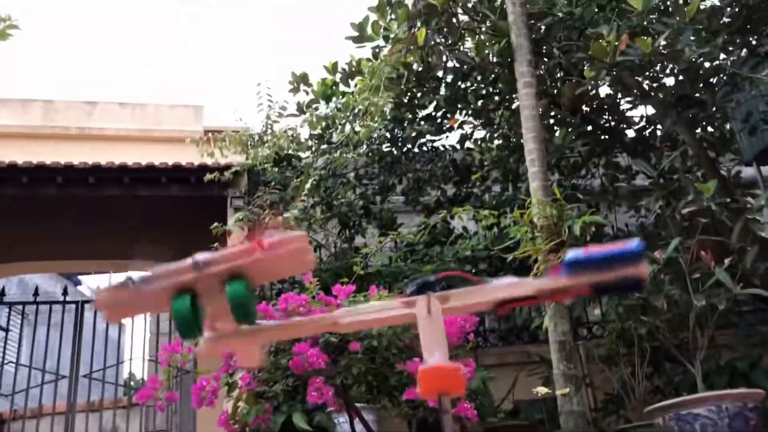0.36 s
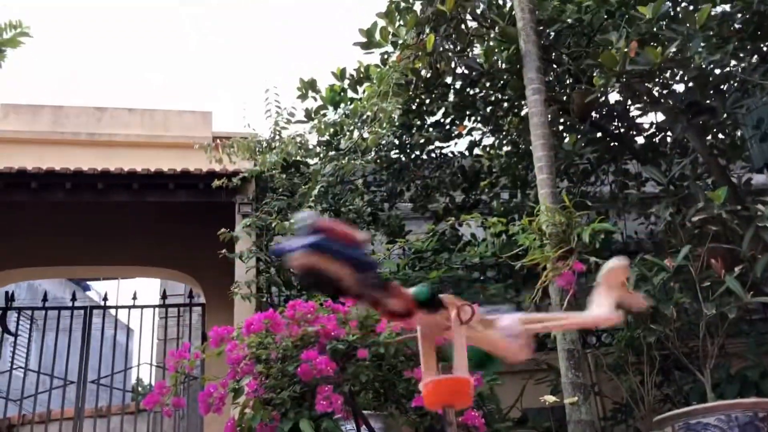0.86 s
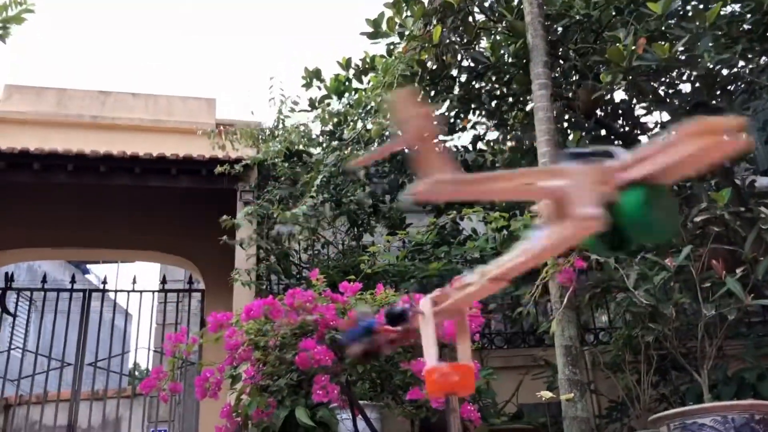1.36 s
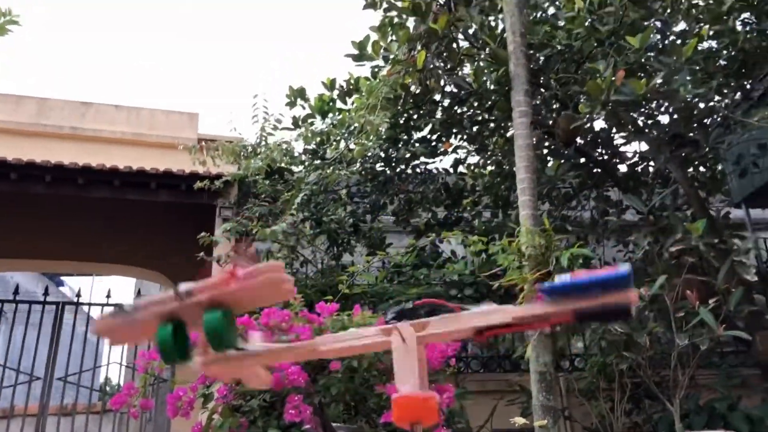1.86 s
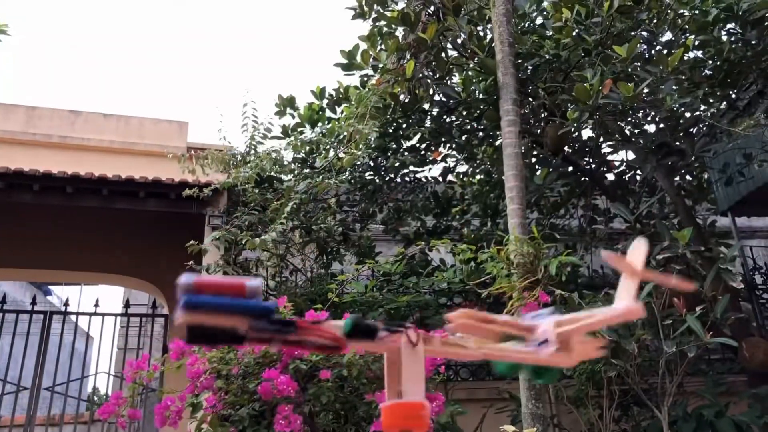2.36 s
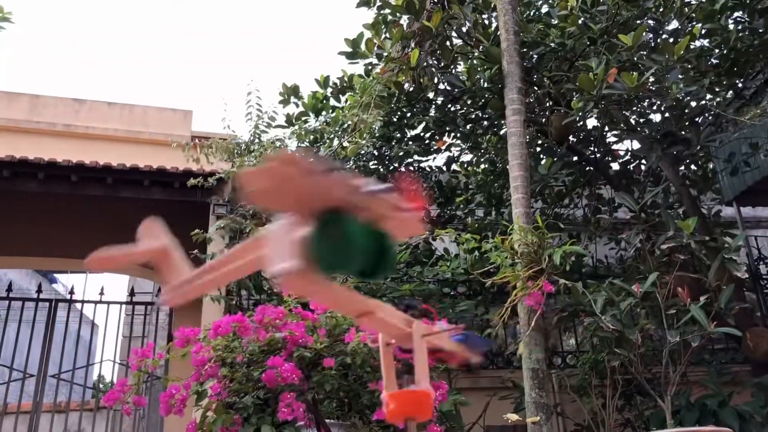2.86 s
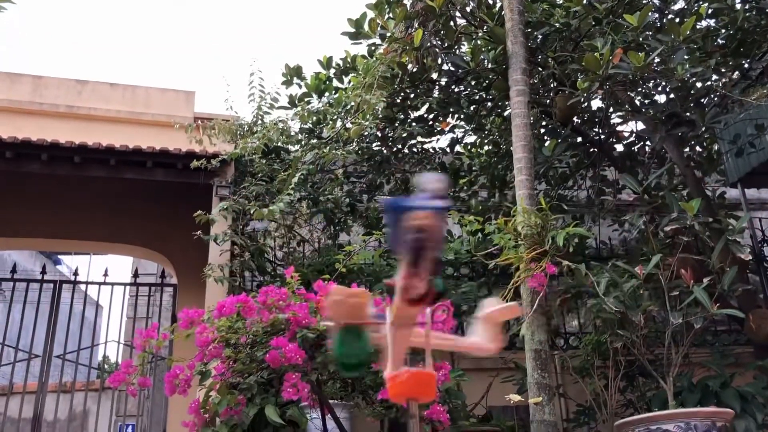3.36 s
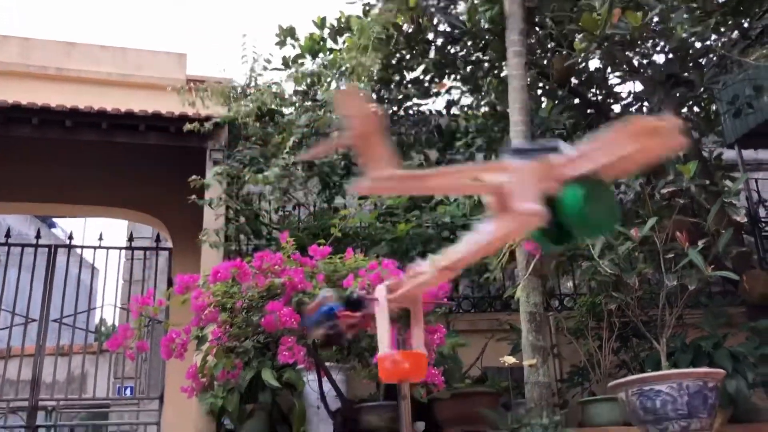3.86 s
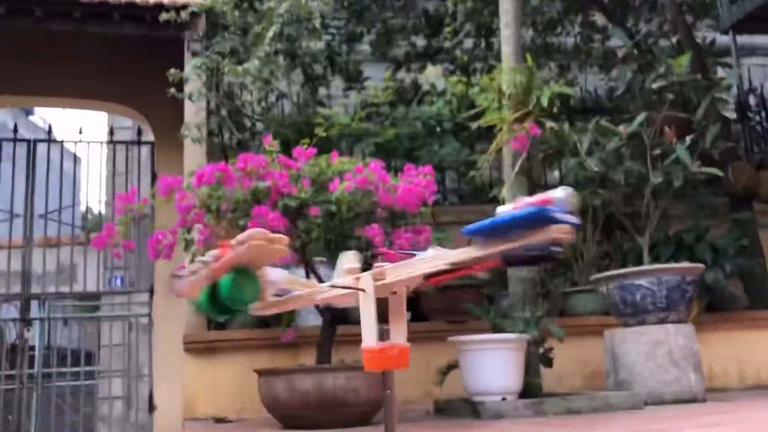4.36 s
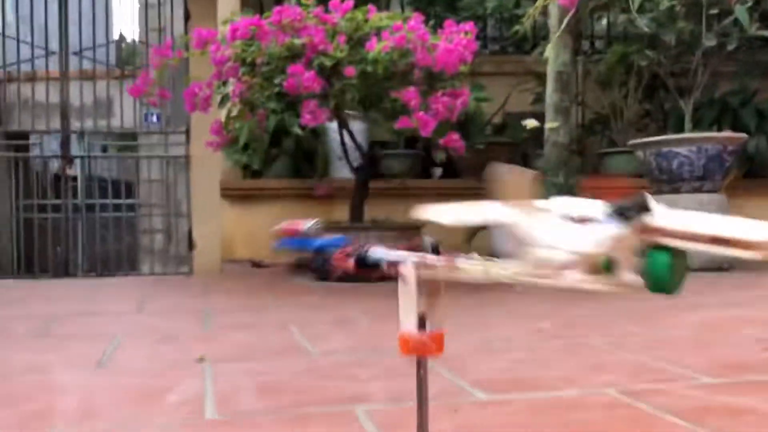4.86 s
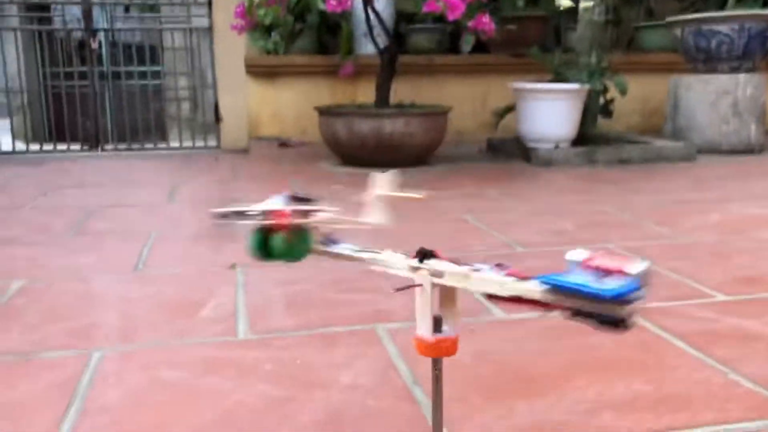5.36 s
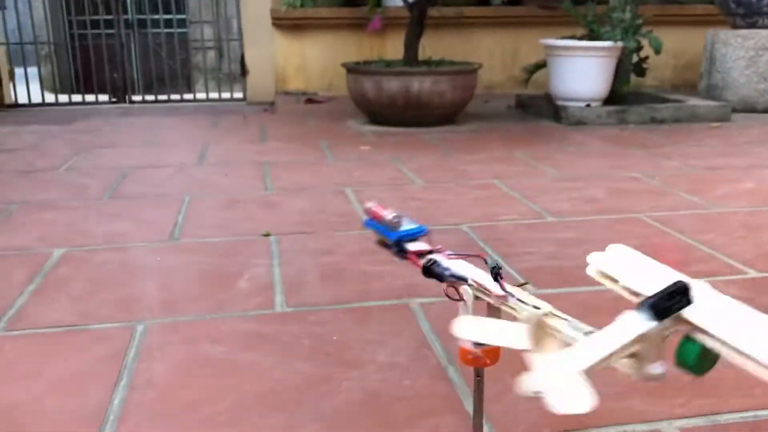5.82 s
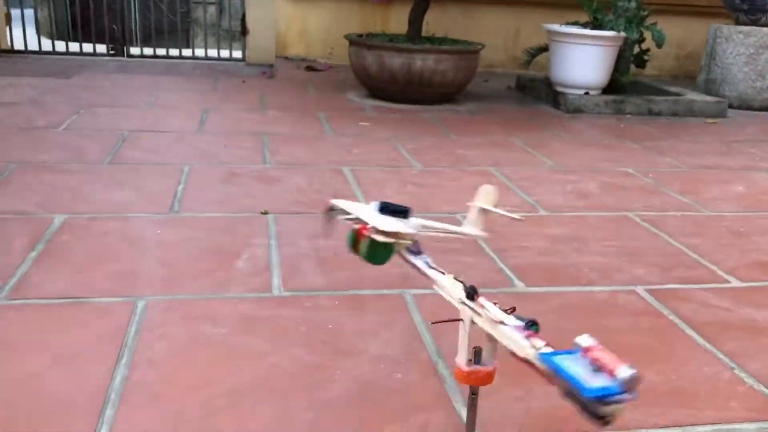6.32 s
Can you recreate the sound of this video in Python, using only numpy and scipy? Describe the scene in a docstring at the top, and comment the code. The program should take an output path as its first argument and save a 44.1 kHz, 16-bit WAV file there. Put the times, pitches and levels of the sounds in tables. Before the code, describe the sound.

Close, high gritty whine of a toy motor and gears dips, spins up, winds down, cuts out and repeats on a quiet patio.

```python
"""A geared electric motor whines close by: a 6-tooth pinion meshes with a 63-tooth wheel.
It sags, spins up again and winds down; twice the sound cuts out and an earlier stretch plays over again.
Tooth-mesh harmonics with wheel-turn sidebands make the whine; rough flanks grind through a resonant casing.
A hum, a slow shaft shake and a panel rattle swell at times; quiet low outdoor air, shaped noise, lies underneath."""
import sys
import numpy as np
from scipy import signal
from scipy.fft import rfft, irfft
from scipy.io import wavfile

SR = 44100
rng = np.random.default_rng(int(sys.argv[2]) if len(sys.argv) > 2 else 0)


def invert_db(level):
    """Linear amplitude ratio for a level in decibels (20 dB per decade), elementwise."""
    return 10 ** (np.asarray(level, dtype=float) / 20)


def wrap_up_sound(samples):
    """Save the sound to the file named by the first command line argument, as 16-bit audio."""
    columns = np.atleast_2d(samples).T
    # keep every value between -1 and 1, then stretch to whole-number steps
    tamed = np.clip(columns, -1, 1)
    steps = np.round(tamed * 32767).astype(np.int16)
    wavfile.write(sys.argv[1], SR, steps)


N = 295909
T = np.arange(N) / SR   # time, s
WHEEL_TEETH, PINION_TEETH = 63, 6
HIGH_SPOT_AT = .14   # place in a wheel turn of the grinding's high spot, turns


def rms_one(x):
    """Normalisation: scale to unit root-mean-square."""
    return x / np.sqrt(np.mean(x ** 2) + 1e-20)


def in_time(rows):
    """Linear interpolation: each column after t/s becomes one value a sample."""
    s, *columns = np.transpose(rows)
    return [np.interp(T, s, column) for column in columns]


def coloured(x, spectrum):
    """Spectral shaping: a smooth (f/Hz, level/dB) outline, interpolated over log frequency."""
    hz = np.maximum(np.fft.rfftfreq(N, 1 / SR), 1)
    points_hz, points_db = np.transpose(spectrum)
    gain_db = np.interp(np.log(hz), np.log(points_hz), points_db)
    return irfft(rfft(x) * invert_db(gain_db), N)


def drift(pole_hz):
    """Low-pass random process: noise through two equal poles, computed every 40 samples, unit rms."""
    r = np.exp(-80 * np.pi * pole_hz / SR)
    noise = rng.standard_normal(N // 40 + 2002)
    slow = signal.lfilter([1], [1, -2 * r, r * r], noise)[2000:]   # settled part only
    return np.interp(np.arange(N) / 40, np.arange(len(slow)), rms_one(slow))


def swelling(rest_db, swells):
    """Amplitude envelope: a rest level with Gaussian rises in dB."""
    rise_db = sum(db * np.exp(-((T - peak_s) / width_s) ** 2) for peak_s, width_s, db in swells)
    return invert_db(rest_db + rise_db)


def resonance(x, hz, width_hz):
    """Second-order resonator: one ringing band, gain 1 at its peak."""
    r = np.exp(-np.pi * width_hz / SR)
    poles = [1, -2 * r * np.cos(2 * np.pi * hz / SR), r * r]
    return signal.lfilter([(1 - r * r) / 2, 0, (r * r - 1) / 2], poles, x)


def worn(turns, size):
    """Periodicity of rotation: a fixed random surface is met again on every turn."""
    surface = rng.standard_normal(size)
    return rms_one(np.interp(turns % 1, np.arange(size) / size, surface, period=1))


def shaft_tones(turns, tones, waver_db=3.5):
    """Shaft orders: faults that recur a whole number of times a turn give slowly wavering sines."""
    out = np.zeros(N)
    for order, db in tones:
        level = invert_db(db + waver_db * drift(3.7))
        out += level * np.sin(2 * np.pi * (order * turns + rng.random()))
    return out


# Outline of the outdoor air: f/Hz, relative spectral level/dB
AIR_OUTLINE = [(40, -12), (85, 2), (200, -10.5), (500, -7), (900, -17), (1500, -19), (16000, -23)]
# Swells of the air: peak t/s, half width t/s, rise in level/dB
AIR_RISES = [(4.9, 0.98, 3.5), (6.7, 0.99, 1.8)]


def outdoor_air():
    """Broadband noise: a mostly low random spectrum whose level drifts."""
    noise = rms_one(coloured(rng.standard_normal(N), AIR_OUTLINE))
    return swelling(-56, AIR_RISES) * invert_db(2.0 * drift(7.1)) * noise


# Swells of the slow shake: peak t/s, half width t/s, rise in level/dB
SHAKE_RISES = [(1.3, .4, 6.5), (2.15, 0.27, 14), (2.7, .3, 12)]


def shaft_shake(wheel):
    """First shaft order: one sine cycle a wheel turn."""
    return swelling(-72.5, SHAKE_RISES) * np.sqrt(2) * np.sin(2 * np.pi * wheel)


# Swells of the hum: peak t/s, half width t/s, rise in level/dB
HUM_RISES = [(0.1, 0.37, 16.5), (.6, 0.33, 16.5), (1.45, 0.055, 5.2), (2.2, .4, 19.6)]


def hum(wheel):
    """A higher shaft order: a sine at 24 cycles a wheel turn."""
    return swelling(-60, HUM_RISES) * shaft_tones(wheel, [(24, 3)], waver_db=1)


# Swells of the panel rattle: peak t/s, half width t/s, rise in level/dB
RATTLE_RISES = [(0, 0.31, 11), (1.02, 0.069, 13), (2.15, 0.17, 9), (2.8, .12, 3.5)]


def panel_rattle(wheel):
    """Forced resonance: a loose panel buzzes at its own pitch, shaken twice a wheel turn by the high spots."""
    shaken = invert_db(8.2 * np.cos(4 * np.pi * (wheel - HIGH_SPOT_AT)))
    rough = rng.standard_normal(N) + 1.8 * worn(wheel, size=1008)
    buzz = rms_one(resonance(shaken * rough, hz=1325, width_hz=110))
    return swelling(-44.5, RATTLE_RISES) * buzz


def grit():
    """Impulsive excitation: dense ticks of uneven size between the teeth, softened by a low-pass."""
    per_s, level_db, spread_db, cut_hz = 900, -7.5, 3.5, 5500   # level is before the low-pass
    sizes = invert_db(spread_db * np.minimum(rng.exponential(1, N), 3)) * rng.choice([-1, 1], N)
    ticks = invert_db(level_db) * rms_one(sizes * (rng.random(N) < per_s / SR))
    return signal.sosfilt(signal.butter(2, cut_hz, fs=SR, output="sos"), ticks)


def knocks(wheel, slack):
    """Backlash impact: loose teeth strike twice a wheel turn as short decaying bursts of noise."""
    decay_s = 0.0011
    at = np.flatnonzero(np.diff(np.floor(wheel * 2 + .1)))
    blows = np.zeros(N)
    blows[at] = slack[at] * invert_db(10.5 + 1.5 * rng.standard_normal(len(at)))
    bursts = rng.standard_normal(N) * signal.lfilter([1], [1, -np.exp(-1 / (decay_s * SR))], blows)
    return signal.sosfilt(signal.butter(2, [900, 11000], "band", fs=SR, output="sos"), bursts)


# Tones of the wheel shaft: cycles per wheel turn, level/dB over the random grinding
WHEEL_ORDERS = [(19, -29), (20, -25), (21, -23), (22, -27), (23, -25), (25, -30), (26, -28), (28, -26),
                (29, -24), (30, -25), (45, -28)]
# Tones of the pinion shaft: cycles per pinion turn, level/dB over the random grinding
PINION_ORDERS = [(17, -25), (21, -24), (22, -28), (25, -26)]


def gear_noise(teeth, slack):
    """Roughness excitation: flanks grind, partly alike each turn; two high spots on the wheel swell it."""
    wheel, pinion = teeth / WHEEL_TEETH - HIGH_SPOT_AT, teeth / PINION_TEETH
    grind = rng.standard_normal(N) + .5 * worn(wheel, size=1008) + grit()
    grind = grind + shaft_tones(wheel, WHEEL_ORDERS) + shaft_tones(pinion, PINION_ORDERS)
    swell_db = 1.1 * np.cos(2 * np.pi * wheel) + .9 * np.cos(4 * np.pi * wheel)
    swell_db = swell_db + .9 * worn(wheel, size=24)
    swell_db = swell_db + 0.23 * drift(5.1) + 1.8 * slack * drift(45)   # loose teeth flutter more
    return grind * invert_db(swell_db) + knocks(wheel, slack)


# Colour the casing gives the grinding: f/Hz, relative spectral level/dB
CASING_OUTLINE = [(35, -45), (60, -33), (129, -18.5), (292, -7.5), (344, -9), (547, -3.5), (979, -8),
                  (1100, -4.5), (1320, -2), (1520, -4.5), (2920, -1.5), (4550, -3.5), (5350, -8.5),
                  (8520, -7), (15600, -17)]
# Resonances of the casing: f/Hz, bandwidth f/Hz, peak gain level/dB
CASING_RINGS = [(315, 49, 1.5), (567, 36, 1.5), (903, 7, 9), (1095, 107, 4.5), (1334, 110, 4),
                (1750, 390, 3.5), (2043, 30, 4.5), (5780, 540, 3.5), (7350, 105, 6.5), (8140, 860, 4),
                (10280, 750, 4.5), (12070, 840, 3.5), (14300, 870, 6.5)]


def housing(x, bright_db):
    """Structural resonance: the casing colours the grinding and rings; its treble has its own gain."""
    x = coloured(x, CASING_OUTLINE)
    for hz, width_hz, ring_db in CASING_RINGS:
        x = x + (invert_db(ring_db) - 1) * resonance(x, hz, width_hz)
    x = rms_one(x)
    low = signal.sosfilt(signal.butter(2, 9500, fs=SR, output="sos"), x)
    return low + invert_db(bright_db) * (x - low)


# Grinding through the run: t/s, level/dB before the treble gain, slack of the teeth (0-1)
GRINDING = [(0, -25, 0.56), (.5, -24.5, 0.4), (.75, -26.5, 0), (1.0, -28, 0.8), (1.21, -29, 1),
            (1.4, -27, 0.45), (1.6, -27, 0.36), (1.95, -25.5, 0.27), (2.35, -26, 0.62), (2.85, -25.5, 0.54),
            (3.05, -27.5, .6), (3.2, -28.5, 0.5), (3.34, -31, 0)]


def grinding(teeth, fade_db):
    """Source and filter: gear noise excites the casing, its treble rising with time and fading with the coast."""
    noise_db, slack = in_time(GRINDING)
    bright_db = -0.5 + 1.16 * T + 0.57 * fade_db   # 1.16 dB per s
    return invert_db(noise_db) * housing(gear_noise(teeth, np.clip(slack, 0, 1)), bright_db)


# Sidebands of an eccentric wheel, one row a mesh tone: level/dB at -3, -2, -1, 0, +1, +2 wheel turns
SIDEBANDS = [(-16, -13, -13, 0, -11, -15), (-13, -8, -6, 0, -8, -16), (-18, -9, -1, 0, -9, -16),
             (-12, -5, -2, 0, -8, -14)]
# Where in a wheel turn each mesh tone peaks: one value a tone [turns]
PEAK_TURN = [.38, .38, .24, .26]


def mesh_tones(teeth, tones_db, runout_db):
    """Modulation by eccentricity: tooth-rate harmonics carry sidebands a wheel turn apart, never quite alike."""
    out = np.zeros(N)
    for k, (tone_db, lines, late) in enumerate(zip(tones_db, SIDEBANDS, PEAK_TURN)):
        flutter = invert_db(tone_db + .8 * drift(10) + .6 * (k + 1) * drift(40))
        for j, line_db in enumerate(lines):
            turns_off = j - 3
            cycles = teeth * (k + 1) + turns_off * (teeth / WHEEL_TEETH - late)
            slip = 0.17 * drift(28)   # radians; backlash lets the contact slip in phase
            side_db = line_db + runout_db * (k == 0 and turns_off != 0)   # first tone's sidebands only
            out += flutter * invert_db(side_db) * np.cos(2 * np.pi * cycles + slip)
    return np.sqrt(2) * out


# How well the casing carries each mesh tone: tooth rate f/Hz, tone 1 to tone 4 level/dB
CARRIED = [(2080, -37, -46, -49, -33), (2180, -40, -45, -43, -37), (2234, -43.5, -40.5, -44, -39.5),
           (2360, -42, -42.5, -35.5, -47.5), (2560, -37, -44.5, -37, -40.5), (2610, -36, -52, -36, -41.5),
           (2690, -33, -51, -40.5, -38.5), (2774, -31.5, -54, -34.5, -42.5),
           (2765, -31.5, -47.5, -34.5, -46.5), (2864, -32.5, -37.5, -39, -48), (2840, -36, -36.5, -35, -52),
           (2980, -32, -49, -39, -56)]
# Change of each mesh tone while the teeth carry no drive: one level/dB a tone
UNLOADED = [0, 0, 0, -2.5]
# How strongly each mesh tone takes the coasting fade: one factor a tone
FADE_WEIGHTS = [0, 2.2, .8, 2.2]


def whine(teeth, hz, power, fade_db):
    """Load and transmission: tooth rate, drive and coasting set the level of each mesh tone."""
    rates, *carried = np.transpose(CARRIED)
    tones_db = []
    for k, db in enumerate(carried):
        tone_db = np.interp(hz, rates, db) + fade_db * FADE_WEIGHTS[k]
        tones_db.append(tone_db + UNLOADED[k] * (1 - power))
    wobble_hz, wobble_width_hz = 2690, 135
    wobble_db = 9.0 * np.exp(-((hz - wobble_hz) / wobble_width_hz) ** 2)
    runout_db = -3 + power * (wobble_db - 4)   # power steadies the wheel, except near the wobble speed
    return mesh_tones(teeth, tones_db, runout_db)


# Power cuts: off t/s, on t/s, first sag [Hz per s], fading [dB per s, before each tone's factor]
POWER_CUTS = [(.6817, 1.211, 1648.6, 0), (2.7949, 9, 1859.6, 10)]


def speed():
    """Rotor inertia: coasts down when cut off, climbs back in two stages; gives tooth rate, power, fade."""
    full_hz, start_short_hz = 2919.47, 30.06   # tooth contacts per s; shortfall left from the start
    coast_lag_s, switch_s = 1.2961, .0201   # friction eases as it slows; softness of the switch
    quick_s, slow_s, quick_share = .1387, .5087, .3599   # the rotor is quick, the load follows slowly

    def since(start_s):
        """Soft ramp: seconds passed since start_s."""
        return switch_s * np.logaddexp(0, (T - start_s) / switch_s)

    hz, idle, fade_db = full_hz - start_short_hz * np.exp(-T / slow_s), 0, 0
    for off_s, on_s, sag, fade in POWER_CUTS[::-1]:
        coasted = since(off_s) - since(on_s)
        driven = since(on_s) - idle   # later coasting does not count
        left = quick_share * np.exp(-driven / quick_s) + (1 - quick_share) * np.exp(-driven / slow_s)
        lost_hz = sag * coast_lag_s * (1 - np.exp(-coasted / coast_lag_s))
        hz = hz - lost_hz * np.minimum(left, 1)
        idle = idle + coasted
        fade_db = fade_db - fade * coasted
    power = 1 - np.gradient(idle) * SR
    return hz, power, fade_db


def motor():
    """Synchronous gearing: whine, grinding, hum, shake and rattle all follow the count of teeth passed."""
    hz, power, fade_db = speed()
    teeth = np.cumsum(hz) / SR
    wheel = teeth / WHEEL_TEETH
    low_parts = shaft_shake(wheel) + hum(wheel)
    return low_parts + panel_rattle(wheel) + grinding(teeth, fade_db) + whine(teeth, hz, power, fade_db)


# Cuts: sound stops t/s, starts again t/s, from motor time t/s
REPLAYS = [(3.341, 3.3712, .63696), (5.0805, 5.11057, .63696)]


def replayed(x):
    """Gating and repetition: a hard stop, a short silence, then an earlier stretch fades in again."""
    fade_in_s = .009
    out = x.copy()
    for stop_s, start_s, from_s in REPLAYS:
        start, origin = round(start_s * SR), round(from_s * SR)
        out[round(stop_s * SR):] = 0
        fade = np.clip(np.arange(N - start) / (fade_in_s * SR), 0, 1)
        out[start:] = fade * x[origin:origin + N - start]
    return out


def scene():
    """Superposition: the motor, with its cuts, over the uninterrupted outdoor air."""
    return (outdoor_air() + replayed(motor()))[None]


def low_pass(x):
    """Removes everything above the highest recorded frequency."""
    return signal.sosfilt(signal.butter(12, 17060, fs=SR, output="sos"), x)


def record(dry):
    """Band limiting: a steep elliptic low-pass cuts the top."""
    mix = signal.sosfilt(signal.ellip(12, .5, 70, 15680, fs=SR, output="sos"), dry)
    return low_pass(mix)


dry = scene()
out = record(dry)
wrap_up_sound(out)
```